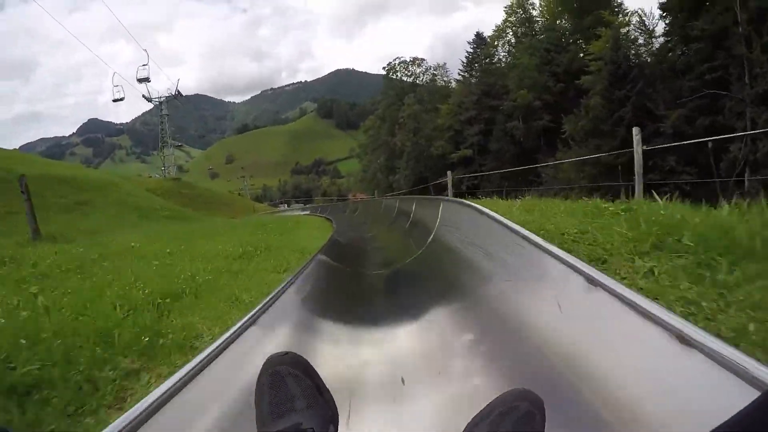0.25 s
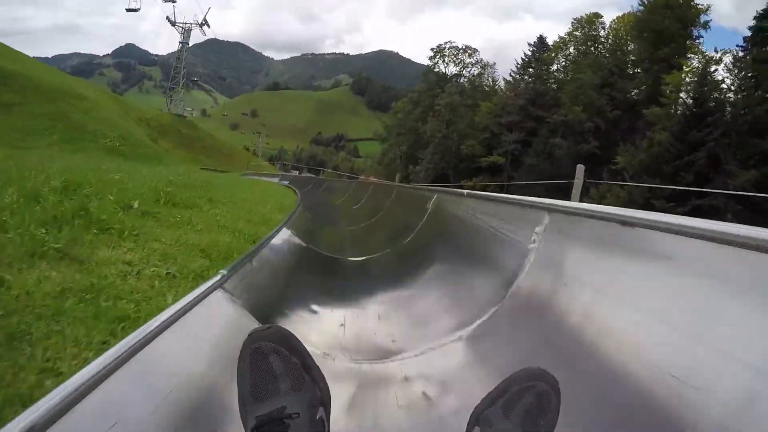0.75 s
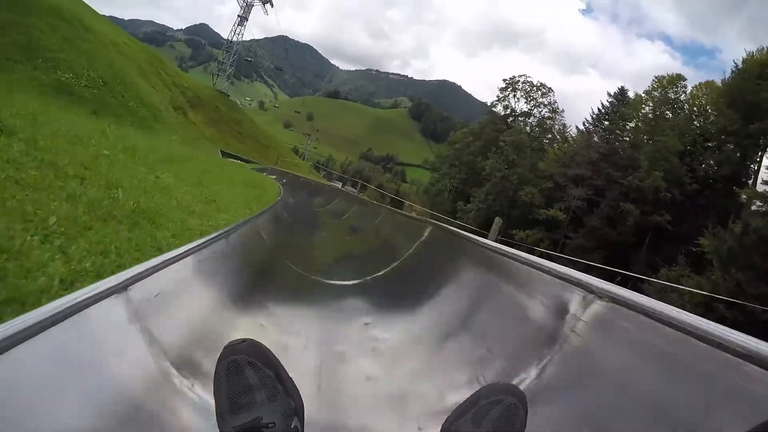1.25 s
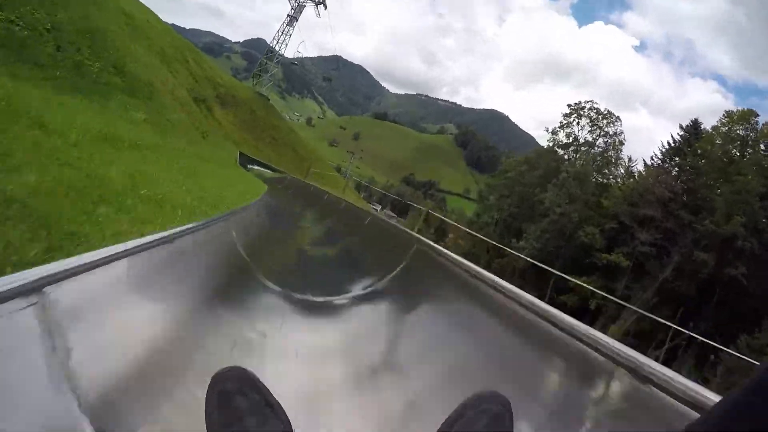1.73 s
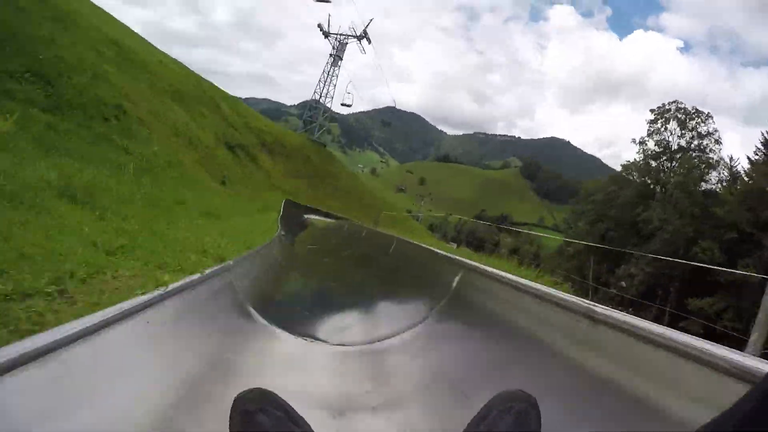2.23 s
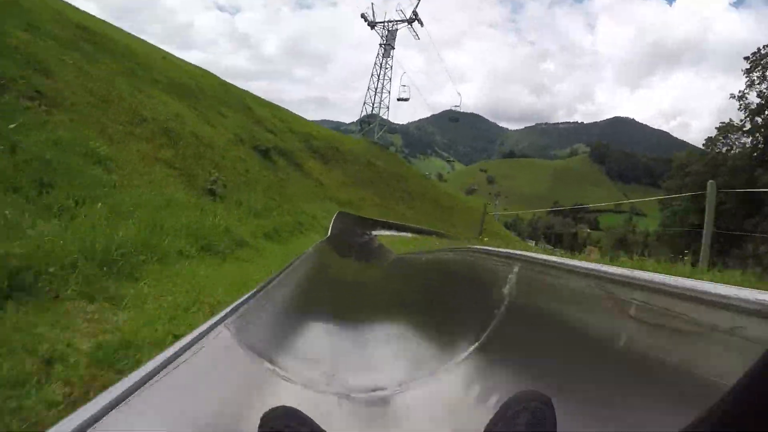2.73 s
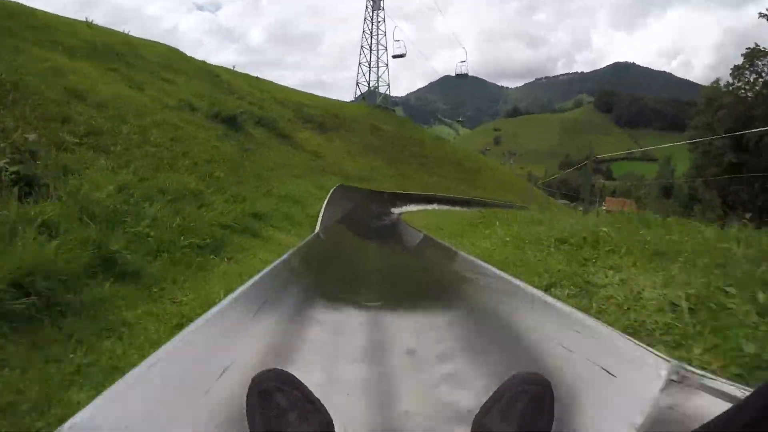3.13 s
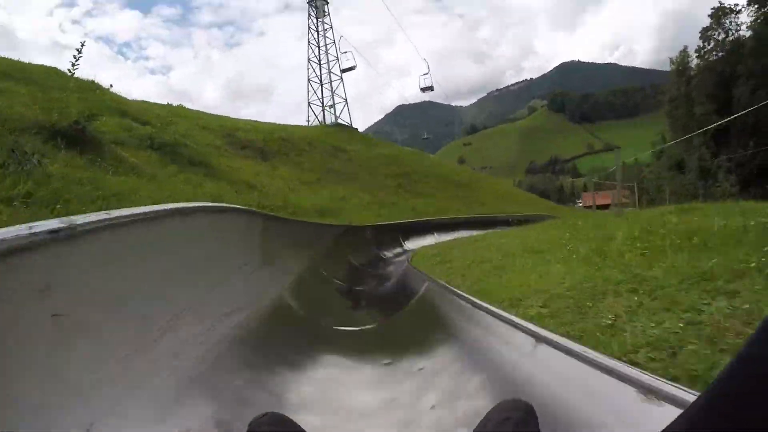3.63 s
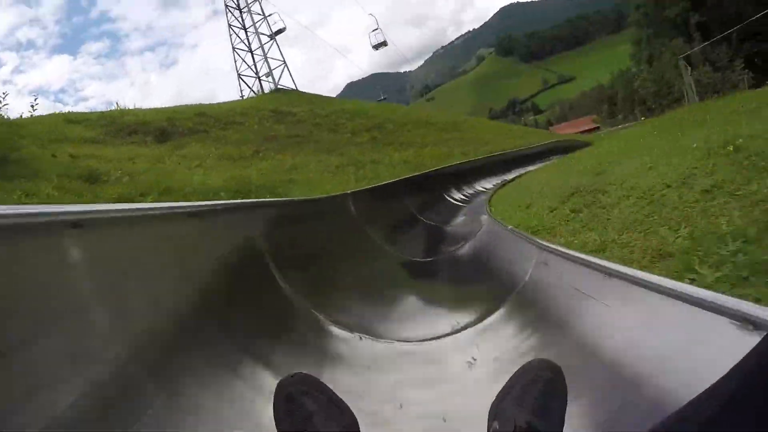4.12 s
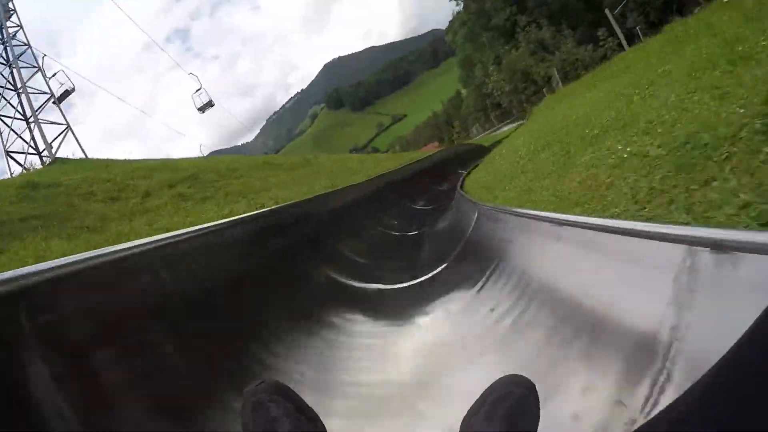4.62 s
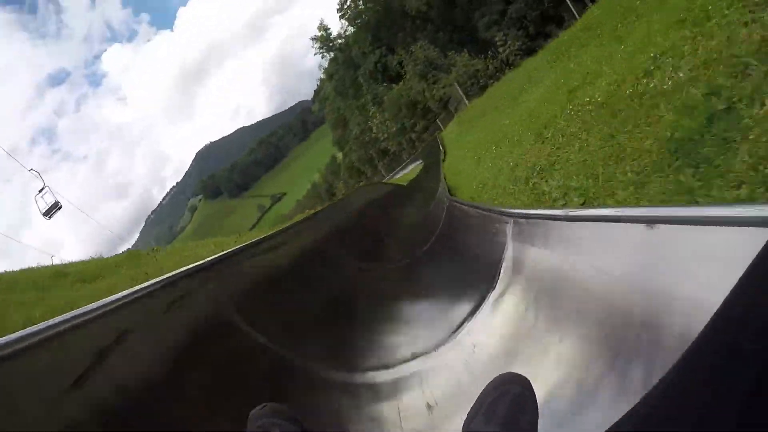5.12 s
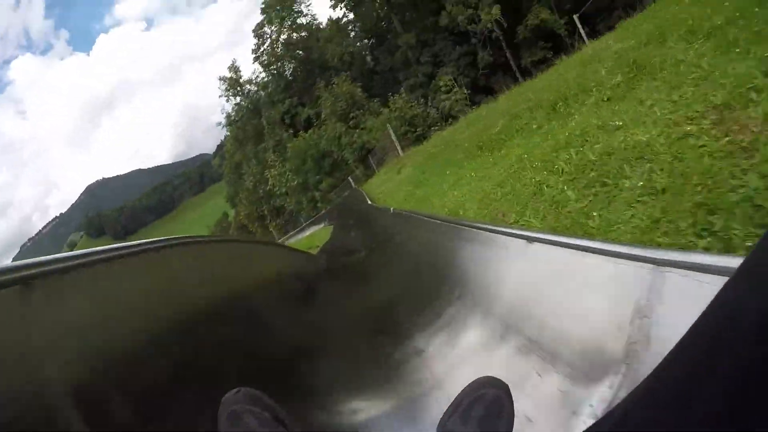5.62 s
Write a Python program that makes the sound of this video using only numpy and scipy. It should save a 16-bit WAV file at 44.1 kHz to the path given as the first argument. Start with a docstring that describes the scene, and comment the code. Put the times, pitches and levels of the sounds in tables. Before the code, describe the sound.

From a small covered camera microphone riding on a sled in an open-air steel trough, low rumble and gritty wheel hiss run throughout. Deep thumps come several times a second, uneven at first, then almost regular in the middle. Hard knocks crack around one, two, three and five seconds, with bursts of rattling loose parts and tiny metallic pings. Everything is close, mono, dry and bass-heavy, with dulled treble.

```python
"""A sled rolls fast down a steel trough, heard from the microphone of a small camera riding along on it.
Wheels hiss through trough and housing over a low drumming of the sheet; ripples and seams heave the sled
in deep, slowing swings (thuds). Hard landings step the mount and ring the case (knocks), loose parts chatter
in bursts of grit that ring the housing (rattles) or sing single fading tones (pings), and air hisses faintly.
All of it is close to the microphone, whose covered port dulls the treble and whose input rounds loud peaks."""
import sys
import numpy as np
from scipy import signal
from scipy.fft import rfft, irfft
from scipy.io import wavfile
from scipy.ndimage import uniform_filter1d

SR = 44100
rng = np.random.default_rng(int(sys.argv[2]) if len(sys.argv) > 2 else 0)


def bounce(signal):
    """Save signal as a 16-bit WAV file at the path given by the first command-line argument."""
    frames = np.transpose(np.atleast_2d(signal))
    limited = np.clip(frames, -1, 1)
    pcm = np.round(limited * 32767).astype(np.int16)
    wavfile.write(sys.argv[1], SR, pcm)


N = 258426  # length in samples

# Rolling between the blows. Each row: time in seconds, wheel hiss drive in relative dB,
# steady drumming level in dB, treble drive of the hiss in relative dB.
ROLLING_LEVELS = [(0.0, -34, -14, -55), (0.13, -45, -25, -57.5), (0.77, -47.5, -26.5, -55.5),
                  (0.96, -43, -22, -56), (1.42, -54.5, -25.5, -59.5), (2.01, -53.5, -24.5, -67),
                  (2.35, -56.5, -27.5, -68.5), (2.74, -54.5, -20.5, -63.5), (3.23, -60, -33, -68),
                  (3.49, -44.5, -27, -59), (3.74, -64.5, -29, -65), (3.98, -49.5, -26, -65),
                  (4.16, -49.5, -22, -60), (4.96, -42, -22, -55), (5.27, -40.5, -19, -55.5),
                  (5.45, -52.5, -36, -65), (5.65, -46.5, -36.5, -56.5), (5.86, -49, -6, -60.5)]
# Spectrum of the sheet's drumming. Each row: frequency in Hz, density in relative dB per Hz.
DRUMMING_SPECTRUM = [(10, -42), (15, -3), (30, 2), (45, 0), (60, -10), (80, -16.5), (115, -27), (170, -43),
                     (300, -71.5)]
# The steel singing under the wheels. Each row: pitch in Hz, width in Hz, gain in dB.
TROUGH_MODES = [(1563, 120, -3.5), (1735, 120, -12)]
# The housing around the microphone. Each row: pitch in Hz, width in Hz, gain in dB.
HOUSING_MODES = [(163, 124, -1.5), (307, 156, -11), (585, 350, -12), (966, 580, -9), (1586, 122, -6.5),
                 (1644, 730, -14.5), (2415, 340, -10), (2766, 32, -7), (3280, 350, -9.5), (3747, 270, -7.5),
                 (4630, 150, -14.5), (5884, 830, -12.5), (6860, 540, -16), (9550, 490, -19.5),
                 (14200, 4400, -19.5)]
# Bursts of chatter. Each row: start in seconds, relative level in dB, brightness in dB,
# nominal 60 dB decay in seconds (each band takes its own share of it).
RATTLES = [(0.025, -29, 2, 0.24), (0.059, -19.5, 0.5, 0.25), (0.2746, -19, -5, 0.23), (0.347, -13, 9, 0.18),
           (0.377, -23, 0.5, 0.33), (0.49, -32.5, 7, 0.063), (0.627, -24.5, -11, 0.073),
           (0.684, -27.5, 0.5, 0.73), (0.846, -31.5, 3, 0.27), (0.9797, -31.5, 3, 0.29),
           (1, -12, 2.5, 0.062), (1.0345, -21, 1.5, 0.076), (1.1278, -26.5, 1.5, 0.39),
           (1.297, -27.5, -1.5, 0.33), (1.4336, -33, 8.5, 0.21), (1.4625, -25.5, 2.5, 0.28),
           (1.605, -21.5, 0, 0.17), (1.687, -31, 6, 0.045), (1.7585, -25, 0, 0.23),
           (1.856, -33.5, 4, 0.078), (1.9076, -35, 2, 0.33), (1.925, -27, 0.6, 0.12),
           (1.9577, -9, 4.5, 0.016), (2.001, -32, 3, 0.054), (2.0668, -31, -6, 0.07),
           (2.1087, -26, -15, 0.042), (2.155, -26.5, 12.5, 0.038), (2.2175, -25.5, 0.3, 0.14),
           (2.268, -13, -1, 0.016), (2.307, -45, 6, 0.053), (2.376, -29.5, 9.5, 0.096),
           (2.462, -29, 12.5, 0.046), (2.508, -36, 6, 0.15), (2.537, -25, 9, 0.11), (2.608, -33, 2, 0.13),
           (2.688, -25, 1.5, 0.15), (2.8112, -30.5, 5, 0.083), (2.8354, -22, -1.5, 0.08),
           (2.9194, -29.5, -1.5, 0.17), (2.953, -36, -5, 0.056), (2.997, -16.5, 4, 0.06),
           (3.032, -37, 7, 0.034), (3.234, -29.5, -3.5, 0.26), (3.33, -19.5, -1, 0.08),
           (3.405, -23.5, -0.5, 0.15), (3.486, -28, 1.5, 0.11), (3.5034, -17, -5, 0.1),
           (3.5543, -25.5, 3.5, 0.092), (3.632, -24.5, 4, 0.096), (3.648, -24, -3, 0.21),
           (3.948, -22.5, -5.5, 0.058), (4.003, -27, 6, 0.18), (4.0362, -26.5, -5, 0.33),
           (4.1255, -33, 12, 0.05), (4.194, -32, 2, 0.44), (4.2214, -24, 7, 0.11), (4.277, -33, -3, 0.13),
           (4.315, -25.5, 0.5, 0.1), (4.3854, -31.5, 4, 0.19), (4.4132, -27, 0, 0.097),
           (4.502, -29.5, -2.5, 0.3), (4.583, -27, 8, 0.17), (4.602, -27, 0.5, 0.36),
           (4.7024, -28, -2, 0.34), (4.721, -20.5, 6, 0.07), (4.8043, -23, -1, 0.18),
           (4.9273, -17.5, -1, 0.12), (4.977, -22, 0, 0.097), (4.997, -20, 3.2, 0.3),
           (5.1193, -36.5, 12, 0.13), (5.178, -32.5, 15, 0.14), (5.2067, -20, 0.5, 0.11),
           (5.322, -23.5, -5, 0.43), (5.3707, -33.5, 7.5, 0.28), (5.402, -21.5, 2.5, 0.2),
           (5.59, -38, 11, 0.13), (5.633, -21.5, -7, 0.047), (5.818, -29.5, -4.5, 0.37)]
# Heaves of the sled. Each row: time of the deepest swing in seconds, level in dB, pitch in Hz at that moment.
THUDS = [(0.07, -6, 40.3), (0.178, -12, 33.5), (0.319, -7.5, 33), (0.377, -2, 38.6), (0.415, -2.5, 34.7),
         (0.509, -13.5, 33.3), (0.725, -2.5, 37), (0.879, -7, 40), (1.018, -3.5, 50.4), (1.051, -7, 37),
         (1.155, -8.5, 33), (1.188, -8, 39.5), (1.308, -10, 33), (1.339, -5.5, 39.2), (1.495, -3.5, 44.6),
         (1.644, -3.5, 38.4), (1.799, -6, 38), (1.876, -13.5, 27.0), (1.929, -9, 42.7), (1.973, -6, 44.5),
         (2.101, -7.5, 44.4), (2.256, -4, 36.7), (2.413, -5, 40.7), (2.564, -7.5, 39), (2.716, -8, 42.2),
         (2.872, -2.5, 43.3), (2.959, -17, 27), (3.014, -3, 57.4), (3.275, -12, 23.6), (3.347, -4, 33.2),
         (3.373, -24, 33.2), (3.442, -12.5, 39.7), (3.523, -2.5, 36.6), (3.666, -4.5, 34),
         (4.025, -1, 55.8), (4.082, -4, 38), (4.215, -4, 53.7), (4.317, -14.5, 40), (4.412, -6.5, 51),
         (4.452, -10.5, 35.4), (4.539, -15, 36.2), (4.608, -1.5, 53.6), (4.644, -13.5, 32.5),
         (4.804, -7.5, 65), (4.842, -7.5, 36.6), (5.012, -4, 32.8), (5.049, -14, 42), (5.108, -13.5, 43.1),
         (5.214, -3.5, 32.4), (5.273, -14, 36.5), (5.417, -6, 44.3), (5.461, -11.5, 51), (5.659, -12, 53.6),
         (5.823, -16, 43)]
# Hard knocks through the mount. Each row: time in seconds, height of the step in dB.
KNOCKS = [(0.279, -27), (0.351, -19), (0.4, -15.5), (0.7097, -18), (1.0028, 2), (1.0399, 2), (1.175, -16.5),
          (1.325, -13), (1.4826, -11), (1.7816, -16.5), (1.812, -5.5), (1.9602, 2.5), (2.111, -6.5),
          (2.244, -15.5), (2.2712, -8), (2.8488, -10.5), (3.0012, 5), (3.3355, -10.5), (3.5066, -10),
          (3.6518, -16), (4.0343, -4.5), (4.2243, -4), (4.4203, -9.5), (4.807, -6.5), (5.0007, 1.5),
          (5.139, -22), (5.1994, -6), (5.405, 6.5), (5.648, -6.5), (5.8127, -11.5)]
# Harder knocks touch more briefly. Each row: knock level in dB, sharpness of the contact in Hz.
CONTACT_SHARPNESS = [(-14, 1180), (-4.5, 2580)]
# Ring of a knock. Each row: pitch in Hz, width of one pass in Hz, relative gain in dB.
KNOCK_MODES = [(1857, 300, -7), (2610, 850, -3.5), (2980, 330, -3), (3840, 390, -22), (6030, 1300, 2),
               (10500, 5400, 3.5)]
# Loose steel parts. Each row: pitch in Hz, 60 dB decay in seconds, blows as (start in seconds, level in dB).
LOOSE_PARTS = [(151, 0.11, [(0.28, -20), (0.352, -25)]), (1605, 0.054, [(1.763, -27.5), (3.409, -37),
               (4.619, -23), (5.432, -23)]), (1790, 0.35, [(1.962, -46), (3.001, -42.5), (3.571, -38)]),
               (2370, 0.068, [(2.157, -33), (2.31, -44), (2.466, -32.5), (2.613, -40)]),
               (2753, 0.27, [(0.721, -41), (1.471, -39), (2.17, -48.5), (3.003, -51)]),
               (5300, 0.045, [(2.16, -42), (2.466, -44)]), (3320, 0.065, [(4.605, -26)]),
               (7100, 0.013, [(2.539, -12)])]

SHAKE_DB, SHAKE_S = -9.5, 0.0615  # drumming stirred by a heave: level against it in dB, spread in seconds
TOP_HZ = 15350  # upper limit of the microphone input


def undb(db):
    """Gain of a dB value."""
    return 10 ** (np.asarray(db) / 20)


def unit(x):
    """Scale to rms 1."""
    return x / np.sqrt(np.mean(x ** 2))


def cut(x, hz, kind, order=2):
    """Butterworth low- or high-pass."""
    return signal.sosfilt(signal.butter(order, hz, kind, fs=SR, output="sos"), x)


def ring(x, hz, width):
    """Resonance with gain 1 at its centre."""
    return signal.lfilter(*signal.iirpeak(hz, hz / width, fs=SR), x)


def walk(rate):
    """Random levels held 1 / rate seconds, then smoothed twice over that time."""
    hold = int(SR / rate)
    steps = np.repeat(rng.standard_normal(N // hold + 1), hold)
    return uniform_filter1d(uniform_filter1d(steps, hold), hold)[:N]


def grit(spread_db):
    """Dense tiny impacts of very uneven size."""
    return unit(rng.standard_normal(N) * undb(spread_db * rng.exponential(size=N)))


def body(x, modes, patchy_db=2.5):
    """Sum of resonances, each fed unevenly as different parts touch; neighbours cancel between their peaks."""
    out = np.zeros(N)
    for hz, width, db in modes:
        feed = x * unit(undb(patchy_db * walk(60)))
        out += undb(db) * ring(feed, hz, width)
    return out


def join_bands(low, mid, high, low_edge_hz=2900.0, high_edge_hz=5500.0):
    """Join three excitations: below, between and above two edges."""
    between = cut(cut(mid, low_edge_hz, "high", order=4), high_edge_hz, "low", order=4)
    return cut(low, low_edge_hz, "low", order=4) + between + cut(high, high_edge_hz, "high", order=4)


def add(track, s, sound):
    """Mix a sound into a track at a time in seconds, trimmed to the track."""
    i = int(round(s * SR))
    a, b = max(i, 0), min(i + len(sound), N)
    track[a:b] += sound[a - i:b - i]


def drumming(heave, rumble_db):
    """Low noise shaped like the drumming sheet, swelling with the smoothed strength of every heave."""
    f = np.maximum(np.arange(N // 2 + 1) * SR / N, 1)
    hz, db = np.transpose(DRUMMING_SPECTRUM)
    shape = undb(np.interp(np.log(f), np.log(hz), db))
    drum = unit(irfft(rfft(rng.standard_normal(N)) * shape, N))
    heave_rms = np.sqrt(np.abs(uniform_filter1d(heave ** 2, int(SHAKE_S * SR))))
    return drum * (undb(rumble_db) + undb(SHAKE_DB) * heave_rms)


def wheel_hiss(hiss_db, treble_db, drive_db=16.0, bright_db=19.5):
    """Gritty contact of the wheels, flickering in level, heard through trough and housing."""
    flicker = unit(undb(1.75 * walk(40) + 2.34 * walk(200) + 1.54 * walk(11)))
    grains = grit(2.67) * flicker
    low = grains * undb(hiss_db + drive_db)
    high = grains * undb(treble_db + bright_db)
    mid = np.sqrt(low * high) * np.sign(grains)  # level halfway in dB between low and high
    through_trough = body(low, TROUGH_MODES, patchy_db=8.0)
    return through_trough + body(join_bands(low, mid, high), HOUSING_MODES)


def air(db=-73.5, tilt_hz=1490.0):
    """A faint smooth hiss of passing air: noise tilted down towards the treble."""
    hiss = cut(rng.standard_normal(N), 150.0, "high")
    return undb(db) * unit(cut(hiss, tilt_hz, "low", order=1))


def rattles(low_db=6.0, mid_db=6.0, high_db=0.0, mid_share=0.56, hold=1.07, attack_s=0.0035):
    """Loose parts chatter in flurries of uneven sub-hits that ring the housing and die treble first."""
    bands, t = np.zeros((3, N)), np.arange(SR // 2) / SR
    lasting = (1.3, 0.95, 0.75)  # share of the nominal decay time: low, mid, high
    for s, db, bright_db, t60 in RATTLES:
        offsets_db = (low_db, mid_db + mid_share * bright_db, high_db + bright_db)
        for band, offset_db, share in zip(bands, offsets_db, lasting):
            fade = undb(db + offset_db - 60 * (t / (share * t60)) ** hold)
            add(band, s, (1 - np.exp(-t / attack_s)) * fade)
    flurry = unit(undb(2.6 * walk(70) + 3.06 * walk(330)))
    return body(join_bands(*(bands * flurry * grit(2.02))), HOUSING_MODES)


def thuds(rise=0.68, fall=0.82, glide=0.16):
    """A swing or two of the sled on its springy sheet; it builds, peaks downward and slows as it dies."""
    out, t = np.zeros(N), np.arange(-3000, 5000) / SR
    for s, db, hz in THUDS:
        turns = hz * t  # cycles counted from the deepest swing; rise and fall are in cycles too
        spread = fall + (fall - rise) * (np.tanh(2 * turns) - 1) / 2  # glides from rise to fall
        swell = np.exp(-(turns / spread) ** 2)
        swing = np.cos(2 * np.pi * (turns - glide * turns ** 2))
        add(out, s + t[0], -undb(db) * swell * swing)
    return out


def knocks(lag_hz=280.0, lag_width=500.0, settle_hz=107.0, snap_db=9.0):
    """A sudden step of the mount: its low part arrives late, settles back, and the edge rings the case."""
    click = np.eye(1, 800)[0]
    pushes = np.zeros(N)
    for s, db in KNOCKS:
        contact_hz = np.interp(db, *np.transpose(CONTACT_SHARPNESS))
        add(pushes, s, undb(db) * cut(click, contact_hz, "low", order=3))  # softer contact, longer push
    step = cut(np.cumsum(pushes), settle_hz, "high", order=1)
    late = step - 2 * ring(step, lag_hz, lag_width)  # an all-pass: same colour, lows delayed
    snap = np.zeros(N)
    for hz, width, db in KNOCK_MODES:
        # through mount and case in turn, so the ring swells for a cycle or two
        snap += undb(db) * ring(ring(step, hz, width), hz, width)
    return late + undb(snap_db) * snap


def pings(waver=0.0053, rough_db=1.5, attack_s=0.0022):
    """Loose steel parts struck: single fading tones that waver in pitch and buzz a little in level."""
    out, t = np.zeros(N), np.arange(SR // 3) / SR
    drift, buzz = walk(60), walk(200)
    for hz, t60, blows in LOOSE_PARTS:
        for s, db in blows:
            start = int(s * SR)
            bend = np.resize(drift[start:], len(t))
            rough = np.resize(buzz[start:], len(t))
            fade = undb(db - 60 * t / t60 + rough_db * rough) * (1 - np.exp(-t / attack_s))
            phase = 2 * np.pi * np.cumsum(hz * (1 + waver * bend)) / SR
            add(out, s, fade * np.sin(phase))
    return out


def scene():
    """All layers at the one microphone on the sled, in one channel."""
    s, *columns = np.transpose(ROLLING_LEVELS)
    hiss_db, rumble_db, treble_db = (np.interp(np.arange(N) / SR, s, c) for c in columns)
    heave = thuds()
    rolling = drumming(heave, rumble_db) + wheel_hiss(hiss_db, treble_db)
    return (rolling + air() + rattles() + heave + knocks() + pings())[None]


def record(dry, port_hz=10500.0, ceiling=1.0):
    """The covered microphone port dulls the treble; the input rounds the loudest peaks; the top is cut."""
    dull = cut(dry, port_hz, "low")
    rounded = dull / (1 + (dull / ceiling) ** 6) ** (1 / 6)
    steep_cut = signal.ellip(10, 0.2, 70, TOP_HZ, fs=SR, output="sos")
    return signal.sosfilt(steep_cut, rounded)


dry = scene()
out = record(dry)
bounce(out)
```